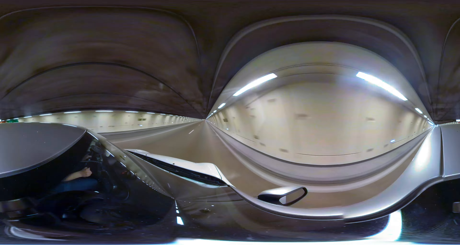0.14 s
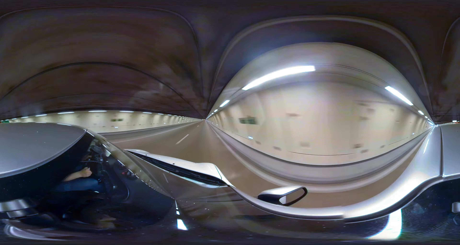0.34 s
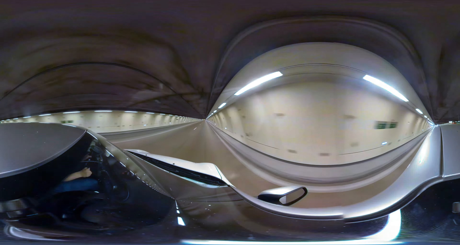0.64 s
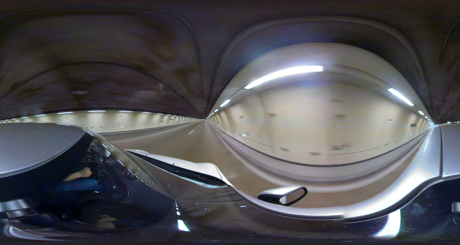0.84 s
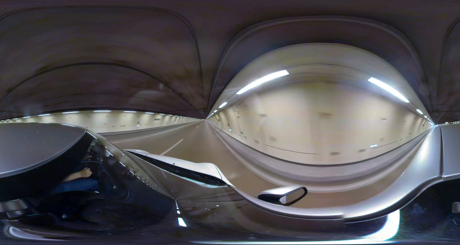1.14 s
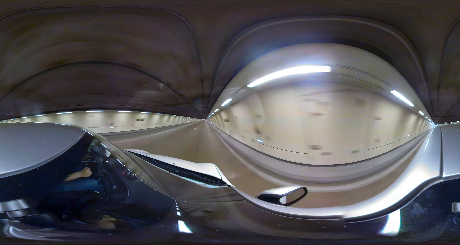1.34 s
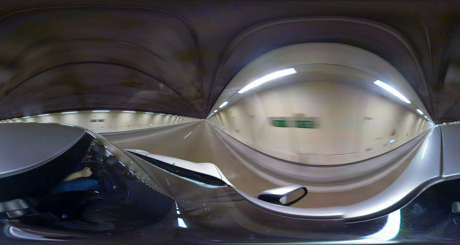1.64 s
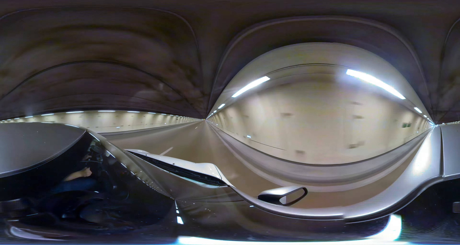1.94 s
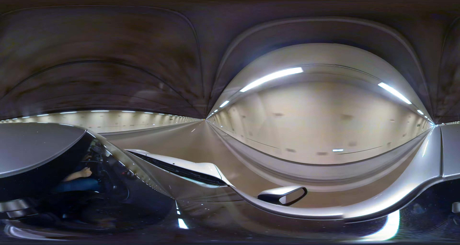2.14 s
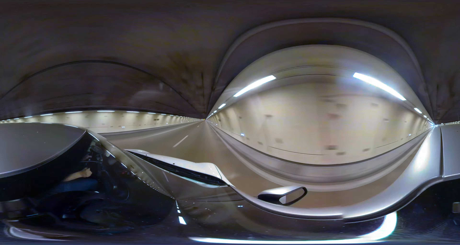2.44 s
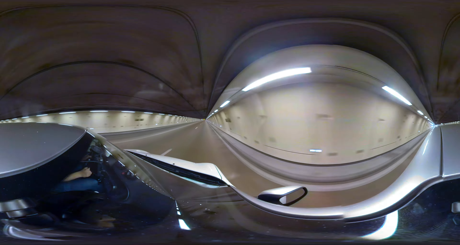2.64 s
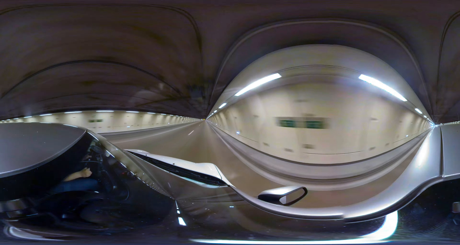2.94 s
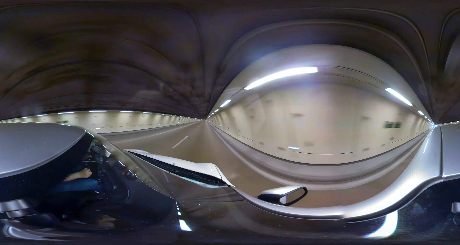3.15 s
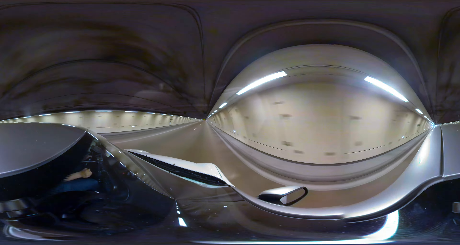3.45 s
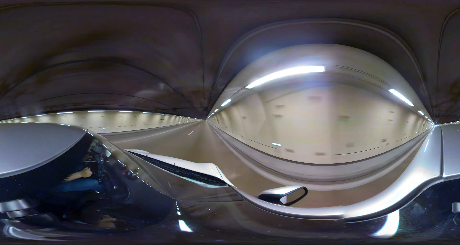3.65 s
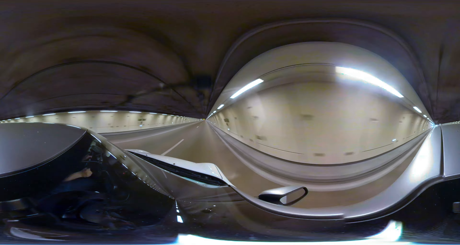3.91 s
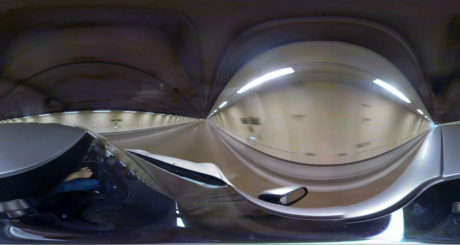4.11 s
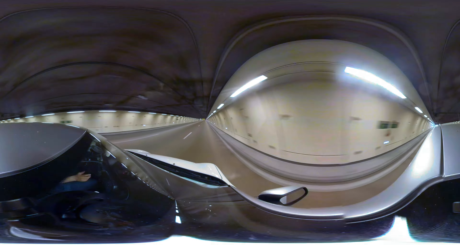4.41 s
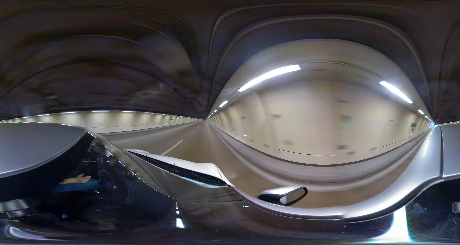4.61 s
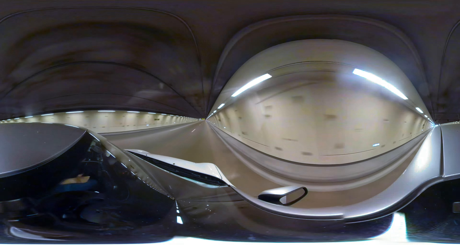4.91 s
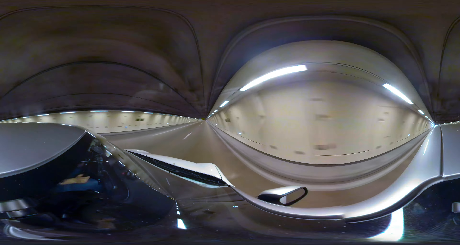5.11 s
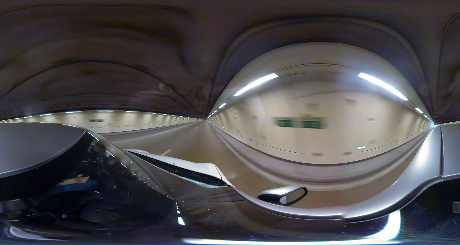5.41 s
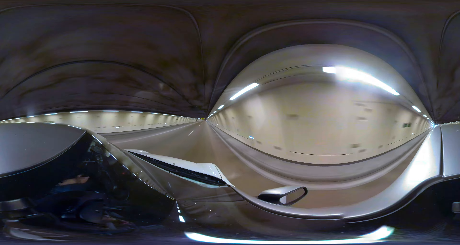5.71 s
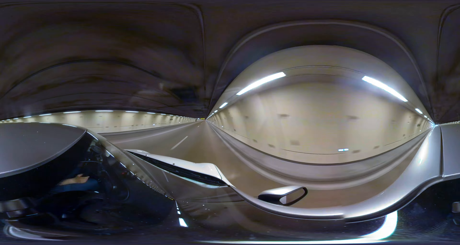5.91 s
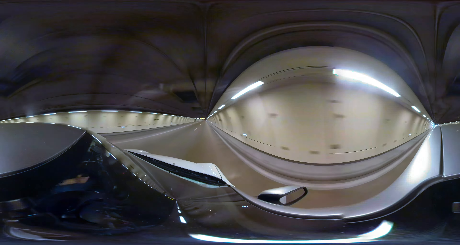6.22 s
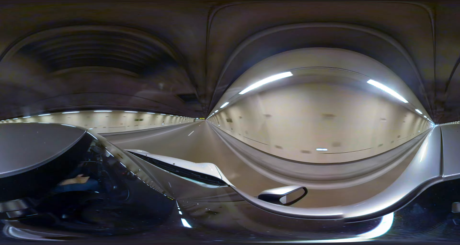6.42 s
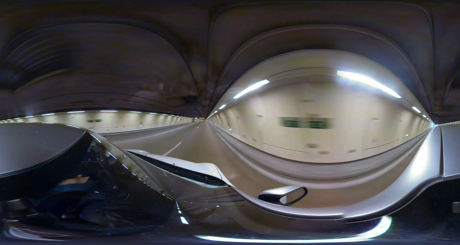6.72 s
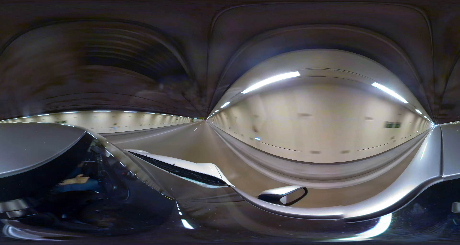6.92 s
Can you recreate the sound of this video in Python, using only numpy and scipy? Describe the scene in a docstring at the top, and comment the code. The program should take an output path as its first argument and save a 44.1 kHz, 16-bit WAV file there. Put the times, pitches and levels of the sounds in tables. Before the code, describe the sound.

Inside a fast car in a tunnel, deep throbbing wind and booming gusts cover hissing, sizzling tyres and small panel knocks.

```python
"""A car drives at speed through a road tunnel, heard from the cabin beside the side window.
From the start, filtered noise makes the wind's throb, buffet and hiss; sine booms thump and a sine whine wavers.
Gusts crowd the first second, and the noise of sizzling rubber is strongest over the first two.
From about 2 s the tyre roar, also noise, swells off the walls, most strongly after 4 s; panel modes ring at bumps.
Three tiny sine blips tick between 5 and 6.2 s; a limiter holds down the biggest peaks throughout."""
import sys
import numpy as np
from scipy import signal
from scipy.fft import rfft, irfft, next_fast_len
from scipy.io import wavfile
from scipy.ndimage import uniform_filter1d, minimum_filter1d, map_coordinates

SR = 44100
rng = np.random.default_rng(int(sys.argv[2]) if len(sys.argv) > 2 else 0)


def waveform_to_disk(signal):
    """Save audio, clipped to [-1, 1], as 16-bit WAV at the path in sys.argv[1]."""
    frames = np.transpose(np.atleast_2d(signal))
    scaled = np.clip(frames, -1, 1) * 32767
    samples = np.round(scaled).astype(np.int16)
    wavfile.write(sys.argv[1], SR, samples)


N = 311346


def amp(db):
    """Level law: decibels to amplitude gain."""
    return 10 ** (np.asarray(db) / 20)


def unit(x):
    """Normalisation: scale to rms 1."""
    return x / np.sqrt(np.mean(x ** 2) + 1e-20)


def curves(rows):
    """Linear interpolation: one value per sample for each column after the time."""
    times, *columns = np.transpose(rows)
    return [np.interp(np.arange(N) / SR, times, column) for column in columns]


def bumps(rows):
    """Superposition of Gaussian bells (time [s], height, half length to 1/e [s])."""
    t = np.arange(N) / SR
    return sum(height * np.exp(-((t - s) / width) ** 2) for s, height, width in rows)


def wobble(rate):
    """Random modulation: a smooth curve through `rate` random knots a second."""
    knots = rng.standard_normal(4096)
    return map_coordinates(knots, [np.arange(N) * rate / SR], mode="wrap")


def filtered(x, response):
    """Linear filtering: multiply the spectrum of x by a response of frequency."""
    size = next_fast_len(N + SR // 2)
    hz = np.fft.rfftfreq(size, 1 / SR)
    return irfft(rfft(x, size) * response(hz), size)[:N]


def coloured(x, spectrum):
    """Spectral shaping: filter x by (frequency [Hz], level [dB]) points on a log axis, to rms 1."""
    f, db = np.transpose(spectrum)

    def response(hz):
        return amp(np.interp(np.log(hz + 1), np.log(f), db, right=-120))

    return unit(filtered(x, response))


def noise(spectrum):
    """Turbulence as a Gaussian random process: coloured noise of rms 1."""
    return coloured(rng.standard_normal(N), spectrum)


def patchy(x, depth_db, size=1024):
    """Non-stationary noise: patches of gain drift in time and frequency."""
    cells = signal.stft(x, nperseg=size)[2]
    field = uniform_filter1d(rng.standard_normal(cells.shape), size=7, axis=0)
    field = uniform_filter1d(field, size=8, axis=1)
    return unit(signal.istft(cells * amp(depth_db * unit(field)), nperseg=size)[1][:N])


def steadied(x, span, share):
    """Envelope compression: even out the slow swells, so that eddies come at a similar strength."""
    window = signal.get_window(("gaussian", span * SR), SR // 2 + 1, False)
    power = signal.fftconvolve(x ** 2, window, "same")
    return unit(x / np.abs(power) ** (share / 2))


# swells of the tyre roar off the tunnel walls: (time [s], rise [dB], half length [s])
WALL_SWELLS = [(2.22, 2.94, 0.5), (4.62, 2.86, 0.5), (5.22, 5, 0.26), (5.68, 1.3, .2), (6.25, 5.64, 0.55)]


def wall_swell():
    """Reflection: the rise in dB as the tunnel walls return the tyre roar."""
    return bumps(WALL_SWELLS)


# small ticks: (time [s], envelope peak [dB], pitch [Hz], half length [s])
TICKS = [(5.310, -37.5, 5200, .00038), (5.6238, -38, 5700, .00021), (6.1835, -45, 5600, .00024)]


def ticks():
    """Wave packets: each tick is a sine a few cycles long under a Gaussian envelope."""
    t = np.arange(N) / SR
    out = np.zeros(N)
    for s, db, hz, width in TICKS:
        out += amp(db) * np.exp(-((t - s) / width) ** 2) * np.sin(2 * np.pi * hz * (t - s))
    return out


# tones of the electrical whine: (mean frequency [Hz], level against the whine strength [dB])
WHINE_TONES = [(4323, -0.5), (9426, -32), (9803, -22.5), (10180, -22.5), (10928, -31)]
# strength of the whine before its random wobble: (time [s], level [dB])
WHINE_STRENGTH = [(0, -70.5), (0.45, -65.5), (0.72, -71.5), (0.95, -65.5), (1.3, -74), (1.55, -68.5),
                  (2.0, -66.5), (2.25, -68.5), (2.6, -65), (2.8, -74), (3.18, -66.5), (3.65, -69.5),
                  (3.92, -77), (4.37, -66.5), (4.8, -70.5), (6.0, -73), (6.25, -66.5), (6.5, -73),
                  (6.7, -69.5), (7.0, -68)]


def whine():
    """Frequency and amplitude modulation: thin electrical tones unsteady in pitch and level."""
    strength_db, = curves(WHINE_STRENGTH)
    out = np.zeros(N)
    for hz, db in WHINE_TONES:
        drift_hz = 7 * wobble(70)
        tone = np.sqrt(2) * np.sin(2 * np.pi * np.cumsum(hz + drift_hz) / SR)
        out += amp(strength_db + db + 1.5 * wobble(24)) * tone
    return out


# spectrum of the slipstream hiss: (frequency [Hz], relative level [dB per Hz])
SLIPSTREAM_SPECTRUM = [(1500, -11.5), (3000, 3.5), (4000, 0), (4700, -3), (5600, -5), (6300, -12),
                       (7100, -11.5), (7600, -15.5), (8300, -17.5), (9100, -23.5), (10400, -17),
                       (11400, -27), (13000, -36), (15000, -45.5)]
HISS_DB, HISS_FOLLOWS = -58, 0.25  # level on a plain stretch [dB]; share of each swell it follows


def slipstream():
    """Broadband flow noise: air hisses along the body, lifted a little by each swell."""
    hiss_db = HISS_DB + HISS_FOLLOWS * wall_swell()
    return amp(hiss_db + 0.32 * wobble(14)) * patchy(noise(SLIPSTREAM_SPECTRUM), depth_db=0.2)


# short hard slaps of air: (time [s], rms level at the top [dB], half length [s])
SLAPS = [(0.848, -37.5, 0.026), (1.06, -35, 0.011), (4.665, -36.5, .02), (5.314, -32.5, 0.02),
         (5.635, -35.5, .025), (6.258, -36.5, 0.008)]
# their spectrum: (frequency [Hz], relative level [dB per Hz])
SLAP_SPECTRUM = [(200, -25.5), (400, -5.5), (650, -7.5), (900, 0.5), (1150, -2.5), (1600, -12), (3000, -37),
                 (7000, -76)]


def slaps():
    """Transient flow noise: an eddy bursts close by with a brief puff."""
    envelope = bumps([(s, amp(db), width) for s, db, width in SLAPS])
    return envelope * noise(SLAP_SPECTRUM)


# modes of the body panels before detuning and tilt: (frequency [Hz], level [dB], 60 dB decay time [s])
PANEL_MODES = [(358, -2.5, 0.031), (448, -0.5, .04), (536, -0.5, 0.03), (705, -1.5, 0.04), (883, -2, 0.044),
               (1130, -9.5, .025), (1460, -15, 0.025)]
KNOCK_ATTACK_S = 0.00059


def panel_ring(tilt_db, detune=0.061):
    """Modal decay: one blow excites damped panel modes, of peak 1; no two ring quite alike."""
    t = np.arange(SR // 8) / SR
    hz, db, t60 = np.transpose(PANEL_MODES)[:, :, None]
    shift, phase = rng.standard_normal((2, len(PANEL_MODES), 1))
    tilt = tilt_db * np.log2(hz / hz[0])  # brightness, in dB per octave
    decay = amp(db + tilt - 60 * t / t60)
    modes = decay * np.sin(2 * np.pi * hz * (1 + detune * shift) * t + phase)
    ring = modes.sum(axis=0) * (1 - np.exp(-t / KNOCK_ATTACK_S))
    return ring / np.abs(ring).max()


# bumps in the road that knock the panels: (time [s], peak [dB], brightness [dB per octave])
KNOCKS = [(0.485, -28, -3), (1.052, -27, -3), (2.632, -23, -10), (2.738, -25, -1), (2.745, -19.5, 1),
          (2.777, -25, -3), (3.19, -23.5, 1), (3.27, -24.5, -2), (3.53, -22.5, -2), (3.863, -26, -13),
          (4.733, -24, 5), (5.63, -25, 0.5), (6.038, -23, -5), (6.049, -26, -4), (6.082, -22.5, 6),
          (6.217, -19, 1), (6.251, -19, 7), (6.289, -22, 4), (6.372, -26, 6), (6.39, -24, -7)]


def knocks():
    """Impact excitation: the tyres strike single bumps and the panels ring."""
    out = np.zeros(N + SR)
    for s, db, tilt_db in KNOCKS:
        ring = amp(db) * panel_ring(tilt_db)
        out[round(s * SR):][:len(ring)] += ring
    return out[:N]


def random_blows(rate, spread_db):
    """Poisson-like process: impulses at random times, `rate` a second, of sizes within +-spread_db."""
    return (rng.random(N) < rate / SR) * amp(spread_db * (2 * rng.random(N) - 1))


ROAR_DB = -39.5  # tyre roar on a plain stretch
# coarse asphalt: rate of blows [per s], level against the tyre roar [dB], spread of sizes [dB]
PATTER_PER_S, PATTER_DB, PATTER_SPREAD_DB = 70, -9, 4.5


def patter(tilt_db=6, tyres=4):
    """Random impact excitation: each tyre sends tiny blows to the panels, swelling with the roar."""
    out = np.zeros(N)
    for _ in range(tyres):
        blows = random_blows(PATTER_PER_S / tyres, PATTER_SPREAD_DB)
        out += signal.fftconvolve(blows, panel_ring(tilt_db))[:N]
    return amp(ROAR_DB + wall_swell() + PATTER_DB) * unit(out)


# strength of the tread drumming before its random wobble: (time [s], level [dB])
TREAD_LEVEL = [(0, -48), (1.4, -54.5), (1.8, -42.5), (2.15, -40.5), (2.45, -43.5), (2.95, -46.5),
               (3.25, -43.5), (4.0, -45), (4.5, -39), (4.8, -44), (5.03, -39.5), (5.35, -40), (5.5, -45),
               (6.3, -40.5), (7.0, -52)]
# its spectrum: (frequency [Hz], relative level [dB per Hz])
TREAD_SPECTRUM = [(500, -40.5), (700, -10), (800, -3), (890, 0.5), (965, -3), (1060, -10), (1450, -37.5)]


def tread_band():
    """Band-limited noise: tread blocks drum on the asphalt in a band whose weight shifts about."""
    level_db, = curves(TREAD_LEVEL)
    return amp(level_db + 0.79 * wobble(35)) * patchy(noise(TREAD_SPECTRUM), depth_db=2.0, size=2048)


# spectrum of rubber sizzling on asphalt: (frequency [Hz], relative level [dB per Hz])
SIZZLE_SPECTRUM = [(600, -15.5), (1200, -1), (1700, 1), (2100, -1.5), (2700, -6.5), (3300, -15.5),
                   (4500, -21.5), (8000, -56)]
# grit in the sizzle: rate of grains [per s], level against the smooth sizzle [dB], spread of sizes [dB]
GRIT_PER_S, GRIT_DB, GRIT_SPREAD_DB = 600, -5.5, 3


def grit():
    """Shot noise: a dense spray of grains of uneven size, in the colour of the sizzle."""
    grains = random_blows(GRIT_PER_S, GRIT_SPREAD_DB)
    return coloured(grains * np.sign(rng.standard_normal(N)), SIZZLE_SPECTRUM)


# spectra of the steady tread roar and of the roar off the walls: (frequency [Hz], relative level [dB per Hz])
ROAR_SPECTRUM = [(300, -29), (480, -12.5), (620, 3), (780, 3), (920, -3.5), (1050, -7), (1400, -10),
                 (2000, -20.5), (3200, -28.5), (8000, -77)]
WALL_SPECTRUM = [(400, -31), (600, -13), (740, -2), (880, -3), (1050, -3.5), (1170, -3.5), (1500, -9),
                 (2000, -18.5), (3200, -41.5), (8000, -80.5)]
# strength of the sizzle before its random wobble: (time [s], level [dB])
SIZZLE_LEVEL = [(0, -43.5), (0.3, -41.5), (0.95, -43), (1.38, -44.5), (1.55, -41.5), (1.78, -41.5),
                (2.05, -45.5), (3.2, -47), (4.2, -47), (5.0, -48), (5.7, -49.5), (6.47, -46.5), (7.0, -50)]


def road():
    """Direct and reflected sound: steady tread roar, higher roar off the walls, gritty sizzle."""
    roar_db = ROAR_DB + wall_swell()
    sizzle_db, = curves(SIZZLE_LEVEL)
    # power shares: the louder the roar, the more of it comes off the walls
    steady_share = 1 / (1 + amp(roar_db + 37.0) ** 4)
    tread = np.sqrt(steady_share) * patchy(noise(ROAR_SPECTRUM), depth_db=0.95)
    walls = np.sqrt(1 - steady_share) * patchy(noise(WALL_SPECTRUM), depth_db=0.36)
    turbulence = unit(wobble(30) + wobble(90))  # moving air roughens the sound on its way in
    sizzle = unit(patchy(noise(SIZZLE_SPECTRUM), depth_db=0.9) + amp(GRIT_DB) * grit())
    roar = amp(roar_db + 0.59 * turbulence) * (tread + walls)
    return roar + amp(sizzle_db + 0.93 * turbulence) * sizzle


# booms of the cabin set off by the biggest eddies: (time [s], envelope peak [dB], mean pitch [Hz])
THUMPS = [(0.06, -21.5, 212.5), (0.28, -18.5, 170), (0.387, -19.5, 211.5), (0.411, -11, 109.6),
          (0.481, -20.5, 195.3), (0.929, -15.5, 70), (1.058, -11, 103.6), (1.55, -20, 180.3),
          (1.749, -19.5, 185), (1.889, -18, 190), (2.294, -15.5, 176.4), (2.529, -20, 185),
          (2.622, -13, 112.5), (2.63, -21, 175), (2.726, -13, 96.5), (2.798, -13, 125), (2.86, -13.5, 80.1),
          (3.137, -13.5, 83.8), (3.27, -9.5, 66), (3.53, -11, 90), (3.66, -21.5, 201.4), (3.89, -22.5, 205),
          (3.91, -12.5, 95), (4.152, -13.5, 108), (4.3, -21.5, 185.3), (4.504, -19.5, 197.8),
          (4.66, -20, 175), (4.84, -17, 151.1), (4.875, -14.5, 105.3), (5.085, -20.5, 177.5),
          (5.276, -17.5, 192.7), (5.29, -10.5, 110.6), (5.74, -15.5, 66), (6.285, -19, 165),
          (6.452, -12.5, 110), (6.52, -13, 104), (6.612, -11, 76), (6.667, -10, 72), (6.82, -16, 128),
          (6.904, -11.5, 108), (6.988, -11.5, 112)]
THUMP_HALF_S = 0.023


def thumps(waver=0.0506):
    """Cavity response: each big eddy swells and dies as a short boom of unsteady pitch."""
    clock = np.cumsum(1 + waver * wobble(50)) / SR
    phases = rng.uniform(0, 2 * np.pi, len(THUMPS))
    out = np.zeros(N)
    for (s, db, hz), phase in zip(THUMPS, phases):
        out += bumps([(s, amp(db), THUMP_HALF_S)]) * np.sin(2 * np.pi * hz * clock + phase)
    return out


# wind at the window before random wobble and dips: (time [s], deep throb [dB], buffeting [dB])
WIND_STRENGTH = [(0, -22, -22), (0.9, -19.5, -21.5), (1.25, -23, -21), (1.55, -22.5, -24),
                 (1.8, -17.5, -18), (2.25, -16.5, -24), (2.55, -25, -20), (2.85, -18.5, -20),
                 (3.5, -21, -20.5), (4.4, -19, -21), (5.1, -21, -21), (5.65, -17, -22.5),
                 (6.15, -24, -19.5), (6.65, -19, -17.5), (7.0, -23, -17.5)]
# gusts and one brief lull in the fine turbulence: (time [s], change of level [dB], half length [s])
GUSTS = [(0.29, 11.5, .02), (0.48, 10, 0.02), (0.64, 3.5, 0.015), (0.83, 5.5, 0.025), (0.94, 8.5, 0.073),
         (1.05, 4, 0.025), (1.69, 2.5, 0.02), (1.85, 5, 0.1), (2.47, 2, .03), (2.74, 4.5, 0.06),
         (2.91, 2.5, 0.02), (3.28, 6, .03), (3.38, 3, .025), (3.87, 3, 0.022), (4.68, 2.5, .02),
         (4.78, -2, .02), (5.62, 2.5, 0.022), (6.27, 2.5, 0.09), (6.88, 4, 0.15)]
# spectra from the deepest band to the highest: (frequency [Hz], relative level [dB per Hz])
THROB_SPECTRUM = [(5, -29.5), (12, -9.5), (25, -4), (52, 1.5), (65, -3.5), (90, -20.5), (200, -71)]
BUFFET_SPECTRUM = [(35, -31.5), (55, -10.5), (68, 2.5), (125, -0.5), (155, -8.5), (220, -24.5),
                   (400, -50.5), (900, -110)]
FLUTTER_SPECTRUM = [(80, -37.5), (125, -2), (155, 1.5), (185, -2.5), (220, -1.5), (260, -8), (320, -14),
                    (420, -30), (1200, -78)]
TEARING_SPECTRUM = [(180, -24.5), (280, 0), (350, -0.5), (450, -6), (560, -8.5), (900, -21), (2000, -38),
                    (5000, -78.5)]
# finer turbulence: base level [dB]; share of each swell it follows
FLUTTER_DB, FLUTTER_FOLLOWS = -27, 0.4
TEARING_DB, TEARING_FOLLOWS = -41, 0.8
# the wind noise dips a little under each thump, in the thump's own band:
# depth [dB]; pitch parting buffet from flutter [Hz]
DIP_DB, PARTING_HZ = 2, 160


def wind():
    """Turbulent pressure: big eddies throb and buffet at the window, with finer turbulence above."""
    throb_db, buffet_db = curves(WIND_STRENGTH)
    swell_db = wall_swell()
    buffet_dip_db = bumps([(s, DIP_DB, THUMP_HALF_S) for s, _, hz in THUMPS if hz < PARTING_HZ])
    flutter_dip_db = bumps([(s, DIP_DB, THUMP_HALF_S) for s, _, hz in THUMPS if hz >= PARTING_HZ])
    throb_db = throb_db + 1.5 * wobble(13)
    buffet_db = buffet_db + 1.2 * wobble(16) - buffet_dip_db
    flutter_db = FLUTTER_DB + FLUTTER_FOLLOWS * swell_db - flutter_dip_db
    tearing_db = TEARING_DB + TEARING_FOLLOWS * swell_db + bumps(GUSTS)
    throb = steadied(noise(THROB_SPECTRUM), span=0.019, share=0.83)
    buffet = steadied(noise(BUFFET_SPECTRUM), span=0.073, share=0.85)
    flutter = steadied(noise(FLUTTER_SPECTRUM), span=0.019, share=0.97) * amp(1.8 * wobble(25))
    tearing = steadied(noise(TEARING_SPECTRUM), span=0.026, share=0.91) * amp(1.6 * wobble(45))
    big_eddies = amp(throb_db) * throb + amp(buffet_db) * buffet
    fine_eddies = amp(flutter_db) * unit(flutter) + amp(tearing_db) * unit(tearing)
    return big_eddies + fine_eddies


def scene():
    """Linear superposition: everything meets at one microphone."""
    air = wind() + thumps() + slaps() + slipstream()
    tyres = road() + tread_band() + patter() + knocks()
    return (air + tyres + whine() + ticks())[None]


def limiter(x, ceiling_db, hold, knee):
    """Dynamic range control: the gain ducks smoothly around every peak that nears the ceiling."""
    size = max(int(hold * SR), 2)  # hold in seconds
    needed = (1 + np.abs(x / amp(ceiling_db)) ** knee) ** (-1 / knee)
    held = minimum_filter1d(needed, size)
    return x * uniform_filter1d(uniform_filter1d(held, size // 2), size // 2)


TOP_HZ = 15700


def record(dry):
    """Limiting and band limitation: the recorder holds down peaks and keeps nothing above TOP_HZ."""
    held = limiter(dry[0], ceiling_db=-6.6, hold=.008, knee=6)
    return filtered(held, lambda hz: hz < TOP_HZ)[None]


dry = scene()
out = record(dry)
waveform_to_disk(out)
```